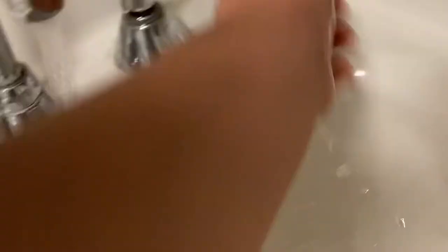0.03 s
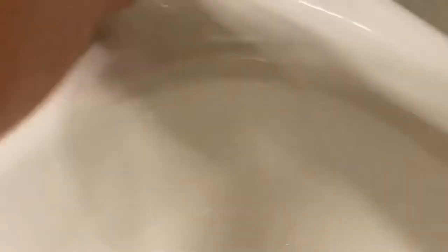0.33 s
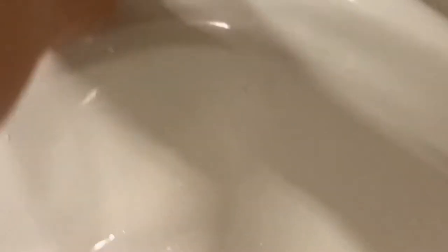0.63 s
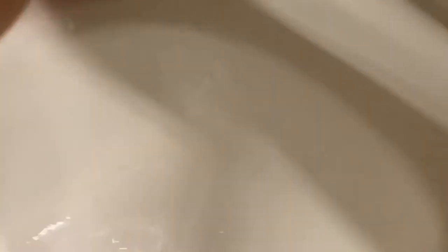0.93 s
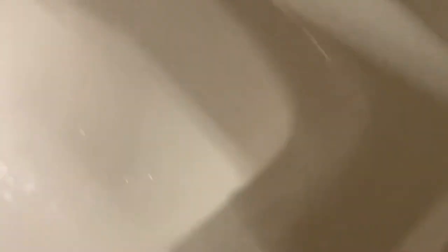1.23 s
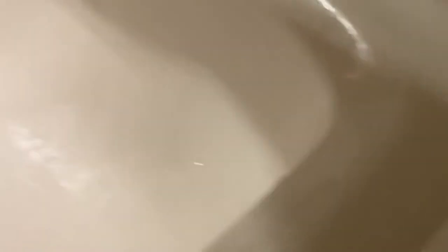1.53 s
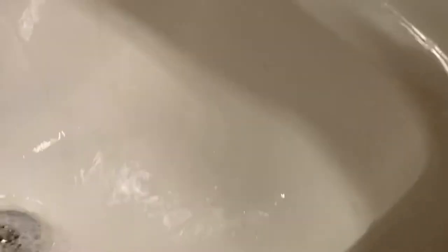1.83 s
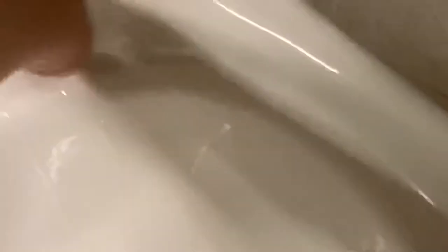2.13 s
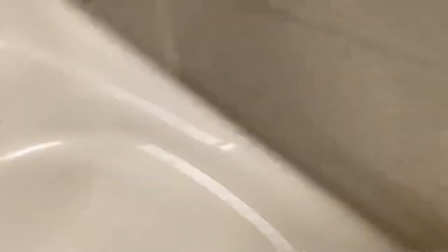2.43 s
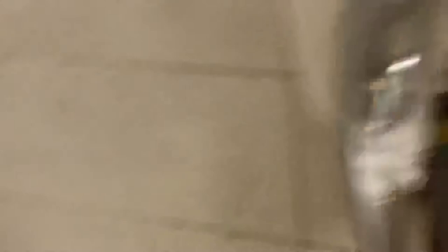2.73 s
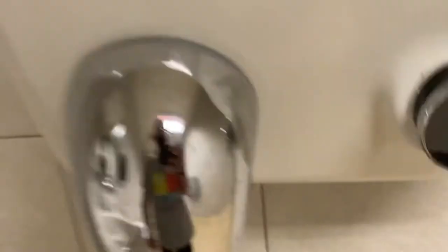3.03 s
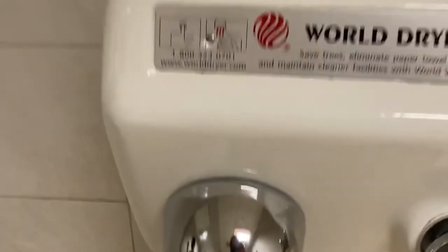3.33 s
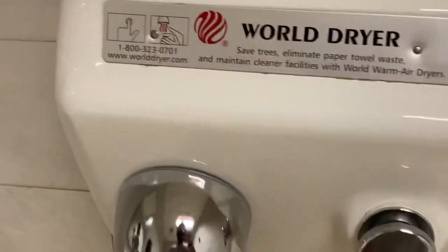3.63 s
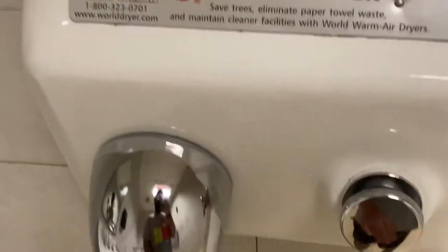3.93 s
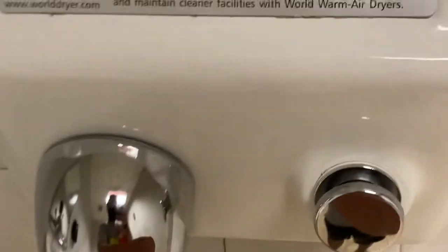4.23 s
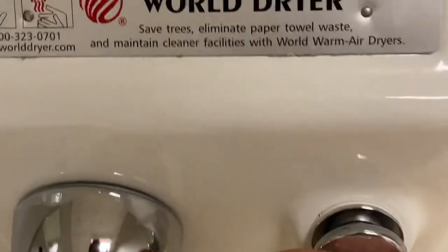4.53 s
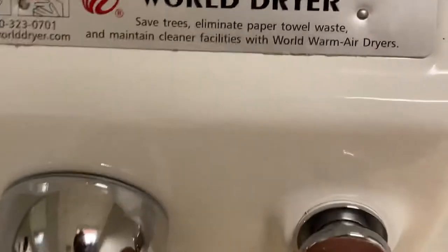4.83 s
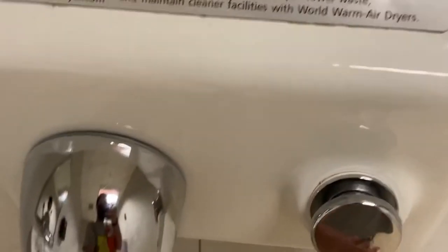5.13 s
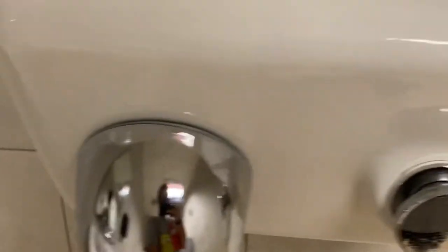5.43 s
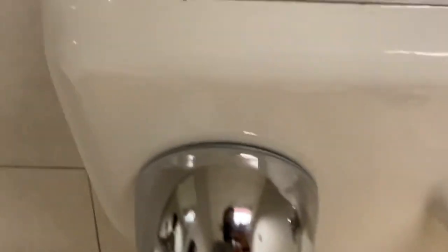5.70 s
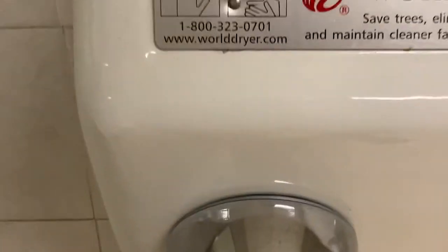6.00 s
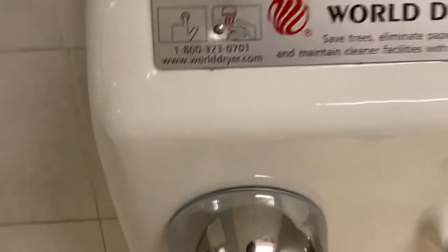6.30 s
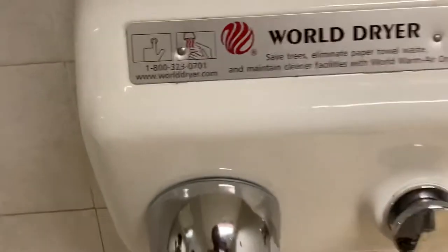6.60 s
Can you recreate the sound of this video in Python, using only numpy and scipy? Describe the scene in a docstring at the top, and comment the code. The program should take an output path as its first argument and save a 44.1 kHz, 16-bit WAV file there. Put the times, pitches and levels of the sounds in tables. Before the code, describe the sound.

Tap water splashes in a sink and stops, then a button clicks and a hand dryer spins up and roars.

```python
"""Ventilation rumbles in a small tiled restroom while a tap splashes over a hand into a china basin:
droplets slap, trapped bubbles ring and the basin drums. The valve sings as it shuts and the pipe thuds.
A few steps follow, with swishing sleeves and a faint high whistle. The button of a wall hand dryer is
pushed, its timer clacks in, the motor hums and spins up, and turbulent air roars and hisses through
the metal nozzle."""
import sys
import numpy as np
from scipy import signal
from scipy.fft import rfft, irfft, next_fast_len
from scipy.io import wavfile
from scipy.ndimage import uniform_filter1d

SR = 44100
rng = np.random.default_rng(int(sys.argv[2]) if len(sys.argv) > 2 else 0)


def wav_record(signal):
    """Record a signal, one row per channel, as 16-bit PCM in the file named by sys.argv[1]."""
    frames = np.transpose(np.atleast_2d(signal))
    bounded = np.clip(frames, -1, 1)
    # unit amplitude maps onto the largest positive 16-bit level
    quanta = np.round(bounded * 32767).astype(np.int16)
    wavfile.write(sys.argv[1], SR, quanta)


N = 293706
TIME = np.arange(N) / SR
SIZE = next_fast_len(N + SR)
FREQS = np.maximum(np.fft.rfftfreq(SIZE, 1 / SR), 1)
FULL_FLOW_DB = -26   # stream level at which all the water hits the china
MOTOR_ON_S = 4.605


def from_db(db):
    """Amplitude ratio of a level in decibels."""
    return 10 ** (np.asarray(db) / 20)


def rms_one(x):
    """Normalisation to unit rms."""
    return x / np.sqrt(np.mean(x ** 2) + 1e-20)


def in_time(rows):
    """Linear interpolation of each column at every sample; the first column is time."""
    s, *columns = np.transpose(rows)
    return [np.interp(TIME, s, c) for c in columns]


def at_hz(points, hz):
    """Interpolation on a logarithmic frequency axis."""
    return np.interp(np.log(hz), np.log(np.array(points)[:, 0]), np.array(points)[:, 1])


def ramp(start, end):
    """Linear rise from 0 to 1 between two times."""
    return np.clip((TIME - start) / (end - start), 0, 1)


def drift(rate_hz):
    """Slow random modulation: low-passed noise of unit rms."""
    hop = 40
    pole = np.exp(-2 * np.pi * hop * rate_hz / SR)
    slow = signal.lfilter([1], [1, -2 * pole, pole * pole], rng.standard_normal(N // hop + 2002))[2000:]
    return np.interp(np.arange(N) / hop, np.arange(len(slow)), rms_one(slow))


def eddies(depth_db, rate_hz):
    """Amplitude-modulated noise, swelling and sagging as eddies pass."""
    return rng.standard_normal(N) * from_db(depth_db * drift(rate_hz))


def ring(clicks, hz, t60):
    """Damped resonator: a unit impulse excites a decaying sine of unit amplitude."""
    r, w = np.exp(-np.log(1000) / (t60 * SR)), 2 * np.pi * hz / SR
    return signal.lfilter([0, np.sin(w)], [1, -2 * r * np.cos(w), r * r], clicks + 1e-18)


def ports(bins):
    """Phase difference between two microphone ports turns a spectrum into a stereo signal."""
    # Each row: frequency in Hz, lead of the left port in radians.
    port_phase = [(0, 0), (1600, .3), (2200, 1.5), (2700, 2.7), (3320, 2.5), (3550, 3.4), (3900, 5.4),
                  (4600, 5.9), (5200, 8.6), (5700, 9.4), (6400, 6.5), (7200, 6.28), (9050, 3.14),
                  (11300, 0), (13600, -3.14), (15500, -6.28)]
    lead = np.interp(FREQS, *np.transpose(port_phase))
    return irfft(bins * np.exp(.5j * lead * np.array([[1], [-1]])), SIZE)[:, :N]


def spread(near, spectrum, resonances=()):
    """Partial coherence: a source and the diffuse field that trails it, coloured alike, at unit rms."""
    # Each row: frequency in Hz, share of the power common to both ports.
    coherence = [(60, 0.916), (300, 0.801), (1150, 0.746), (1500, 0.387), (2200, 0.405), (2700, 0.114),
                 (3400, 0.224), (4500, 0.145), (5600, 0.106), (6300, 0.26), (7200, 0.69), (9000, 1),
                 (16000, 0.99)]
    gain = from_db(at_hz(spectrum, FREQS))
    for hz, width_hz, lift_db in resonances:
        gain = gain * from_db(lift_db / (1 + (2 * (FREQS - hz) / width_hz) ** 2))
    alike = np.clip(at_hz(coherence, FREQS), 0, 1)
    trail = np.sqrt(signal.lfilter([1], [1, -np.exp(-1 / (0.00305 * SR))], near ** 2 + 1e-18))
    diffuse = rfft(rms_one(trail * rng.standard_normal((2, N))), SIZE)
    direct = rfft(rms_one(near), SIZE)
    return rms_one(ports(gain * (np.sqrt(alike) * direct + np.sqrt(1 - alike) * diffuse)))


def near_walls(x, echo_db, sway_s):
    """Comb filtering: early reflections ripple the spectrum, shifting as the microphone moves."""
    lags = [lag + sway_s * drift(.5) for lag in rng.uniform(.001, .008, 4)]
    echoes = sum(x[np.clip(np.arange(N) - np.round(lag * SR).astype(int), 0, N - 1)] for lag in lags)
    return x + from_db(echo_db) * echoes


def tile_response():
    """Reverberation: the spectrum of the room's stereo tail, each band decaying at its own rate."""
    # Each row: frequency in Hz, reverberation time in seconds.
    room_t60 = [(100, 0.184), (500, 0.52), (3000, 0.574), (8000, 0.264), (16000, 0.061)]
    t, edges, tail = TIME[:SR * 3 // 4], np.geomspace(50, 18000, 9), 0
    for low, high in zip(edges, edges[1:]):
        bandpass = signal.butter(2, [low, high], "band", fs=SR, output="sos")
        band = signal.sosfilt(bandpass, rng.standard_normal((2, len(t))))
        tail = tail + band * np.exp(-np.log(1000) * t / at_hz(room_t60, np.sqrt(low * high)))
    tail = tail * np.clip(t / 0.00113, 0, 1)
    return rfft(tail / np.sqrt(np.sum(tail ** 2) / 2), SIZE)


def in_room(x, tiles, wet_db):
    """Convolution adds the reverberation of the tiles to the direct sound."""
    return ports(rfft(x, SIZE) * (1 + from_db(wet_db) * tiles))


def strike(blows, modes, crack_db, crack_s, top_hz, tail_db):
    """Modal response to impacts; countless small modes merge into a crack and a faint tail."""
    onsets, forces = [round(s * SR) for s, db in blows], from_db([db for s, db in blows])
    ringing, crack = np.zeros(N), np.zeros(N)
    for hz, level_db, t60 in modes:
        clicks = np.zeros(N)
        clicks[onsets] = forces * from_db(level_db + rng.normal(0, 2.01, len(onsets)))
        ringing += ring(clicks, hz, t60) * rng.choice([-1, 1])
    for i, force in zip(onsets, forces):
        age = TIME[:N - i]
        crack[i:] += force * (np.exp(-age / crack_s) + from_db(tail_db) * np.exp(-age / 0.0644))
    dull = signal.butter(2, min(top_hz, .45 * SR), fs=SR, output="sos")
    noise = signal.sosfilt(dull, signal.sosfilt(dull, crack * rng.standard_normal(N)))
    return ringing + from_db(crack_db) * noise


def wavering_tone(hz, depth_hz, rate_hz):
    """Random frequency modulation of a unit sine."""
    return np.sin(2 * np.pi * np.cumsum(hz + depth_hz * drift(rate_hz)) / SR)


def ventilation():
    """Broadband and tonal fan noise: duct rumble, two wavering tones and a faint wash of air."""
    # Each row: frequency in Hz, relative spectral density in dB.
    rumble_spectrum = [(22, -30), (38, -48.5), (55, 6), (72, -10.5), (95, 1), (115, -5), (145, 2),
                       (190, -8.5), (300, -18.5), (450, -26.5), (900, -47.5)]
    air_spectrum = [(150, -3), (320, 9.5), (500, -1.5), (750, -3), (1200, -8), (2300, -9.5), (4000, -17),
                    (7000, -24.5), (12000, -32.5), (16000, -56)]
    # Each row: time in seconds, level in dB.
    rumble_level = [(0.0, -33), (0.12, -39), (1.3, -36.5), (1.53, -38), (2.09, -38), (2.5, -38.5),
                    (2.7, -41), (2.97, -38.5), (3.02, -48), (3.06, -41), (3.12, -36), (3.3, -36.5),
                    (3.7, -39), (4.26, -40.5), (4.4, -37)]
    air_level = [(1.5, -47.5), (1.85, -50), (2.3, -49), (2.65, -50), (2.9, -48.5), (3.3, -48), (4.0, -48.5),
                 (4.2, -50.5)]
    # Each row: frequency in Hz, level in dB relative to the rumble level.
    fan_tones = [(72.5, -3.5), (139, -3.5)]
    rumble = from_db(-1.5) * spread(rng.standard_normal(N), rumble_spectrum)
    tones = sum(np.sqrt(2) * from_db(db + 2.0 * drift(3.46)) * wavering_tone(hz, 0.787, rate_hz=3.3)
                for hz, db in fan_tones)
    air = spread(near_walls(rng.standard_normal(N), echo_db=-9, sway_s=.0004), air_spectrum)
    duct = from_db(in_time(rumble_level)[0] - 0.5) * (rumble + tones)
    return duct + from_db(in_time(air_level)[0]) * air


def flow_db():
    """Strength of the tap stream in dB relative to full flow."""
    # Each row: time in seconds, stream level in dB.
    stream_level = [(0, -41), (0.17, -40), (0.45, -38.5), (0.538, -34), (0.558, -32), (0.622, -34),
                    (0.63, -26), (0.68, -26.3), (0.9, -24.5), (1.05, -25.3), (1.2, -31), (1.3, -39),
                    (1.41, -45), (1.53, -68)]
    return in_time(stream_level)[0] - FULL_FLOW_DB


def patter(per_s, size_spread_db):
    """Shot noise: uneven droplets land at random, with a mean power independent of their rate."""
    sizes = from_db(size_spread_db * np.minimum(rng.exponential(1, N), 4)) * rng.choice([-1, 1], N)
    return sizes * (rng.random(N) < per_s / SR) / np.sqrt(per_s)


def tap(tiles):
    """Droplet impacts on hand and china, bubble resonance and basin drumming all follow the flow."""
    # Each row: frequency in Hz, relative spectral density in dB.
    spray_spectrum = [(1200, -23.5), (2450, -24), (2850, -13), (3200, 1), (3600, 3), (4100, -1),
                      (4700, -11), (6000, -7), (7000, -1), (9800, 4), (11500, 1.5), (13500, -5.5),
                      (16000, -13)]
    basin_spectrum = [(90, -12), (185, 13.5), (245, 2.5), (310, 10.5), (380, 10), (560, 6.5), (850, -2),
                      (1150, -3), (1700, -2.5), (2500, -3), (3500, -9)]
    # Each row: frequency in Hz, width in Hz, lift in dB.
    basin_resonances = [(578, 50, 4.3), (1145, 80, 7.5)]
    flow, trickle_per_s = flow_db(), 400
    per_s = trickle_per_s + 6000 * from_db(1.7 * flow)   # a stronger stream breaks into more droplets
    # A thin stream lands in gobs, each dying within milliseconds; a full one is more even.
    landings = (rng.random(N) < 90 / SR) * rng.random(N)
    gobs = signal.lfilter([1], [1, -np.exp(-1 / (0.0024 * SR))], landings + 1e-18)
    lumps = 1 + 5.5 * gobs * np.sqrt(trickle_per_s / per_s)
    lumps /= np.sqrt(uniform_filter1d(lumps ** 2, size=SR // 5))
    impacts = patter(per_s, size_spread_db=5.0) * lumps
    spray = spread(near_walls(impacts, echo_db=-9.5, sway_s=.0004), spray_spectrum)
    bubbles = sum(ring(patter(per_s / 160, size_spread_db=9), hz, t60=32 / hz)
                  for hz in np.geomspace(3150, 4600, 22))
    fizz = in_room(rms_one(bubbles), tiles, wet_db=-5)
    drumming = spread(patter(per_s, size_spread_db=0.5), basin_spectrum, basin_resonances)
    water = from_db(FULL_FLOW_DB + flow) * (from_db(1.5) * spray + from_db(-12) * fizz)
    water += from_db(-32.3 + 0.53 * flow) * drumming
    return water * (1 - ramp(1.64, 1.642))


def small_drops(count):
    """Random sampling of lesser drops: rows of time, level and pitch, the level following the flow."""
    last_s, low_hz, high_hz = 1.44, 3300, 12500
    when, size, pitch = rng.random((count, 3)).T
    s = last_s * (np.arange(count) + when) / count
    level_db = -19 + .75 * np.interp(s, TIME, flow_db()) + 3 * (2 * size - 1)
    return list(zip(s, level_db, low_hz * (high_hz / low_hz) ** pitch))


def drops(tiles):
    """Impact and bubble resonance: a drop slaps, sprays briefly and traps air that rings a few cycles."""
    # Each row: start in seconds, level in dB, bubble pitch in Hz.
    loud_drops = [(0.0253, -21, 4000), (0.029, -23, 7200), (0.0488, -24, 7720), (0.0662, -21, 7620),
                  (0.078, -25, 7400), (0.0992, -20, 7530), (0.1306, -10, 4160), (0.1434, -19, 4140),
                  (0.1465, -20, 6900), (0.1675, -18.5, 4160), (0.1885, -23, 7500), (0.1945, -21, 3870),
                  (0.2214, -18, 4120), (0.2304, -15, 11200), (0.2478, -18, 7750), (0.2574, -19, 7350),
                  (0.2758, -18, 3930), (0.2932, -19, 3650), (0.3062, -16, 4610), (0.3098, -19, 7000),
                  (0.3341, -22, 4550), (0.3392, -22, 7400), (0.3666, -18, 10500), (0.3925, -19, 11000),
                  (0.3974, -18, 4410), (0.4199, -16, 11600), (0.4354, -16.5, 12200), (0.4638, -18, 4780),
                  (0.4903, -17, 10800), (0.5302, -20, 7300), (0.5477, -19, 4320), (0.5601, -14, 4370),
                  (0.5811, -11.5, 10100), (0.5978, -13, 11000), (0.6285, -15, 11600), (0.6324, -9.5, 3500),
                  (0.6404, -14, 3540), (0.6594, -13, 11700), (0.7216, -12, 11500), (0.767, -15, 11400),
                  (0.8423, -14, 11600), (0.8748, -14, 7210), (0.8967, -13, 11300), (0.9601, -14, 10800),
                  (1.0194, -14, 11500), (1.0454, -12, 10500), (1.0574, -10, 11200), (1.07, -8, 10800),
                  (1.0903, -14, 11200), (1.1194, -13, 10700), (1.1274, -13, 10700), (1.1653, -16, 3860),
                  (1.281, -17, 3900), (1.3039, -18, 6800), (1.3483, -16, 7530), (1.4017, -26, 11100),
                  (1.4135, -25, 11000), (1.4182, -23, 11000), (1.441, -31, 7500)]
    slap_s, spray_s, decay_cycles = .0015, .005, 5.0
    rise_per_s = 25   # relative climb in pitch as a bubble nears the surface
    out, t = np.zeros(N), TIME[:SR // 20]
    thin = signal.butter(2, 3200, "high", fs=SR, output="sos")
    splash = np.exp(-t / slap_s) + from_db(-18) * np.exp(-t / spray_s)
    attack = np.clip(t / 0.0004, 0, 1)
    for s, level_db, hz in list(loud_drops) + small_drops(count=30):
        bubble = np.sin(2 * np.pi * hz * t * (1 + rise_per_s * t / 2)) * np.exp(-t * hz / decay_cycles)
        slap = signal.sosfilt(thin, rng.standard_normal(len(t)) * splash)
        drop = from_db(-2.5) * bubble + from_db(-0.5) * slap
        out[round(s * SR):][:len(t)] += from_db(level_db) * drop * attack
    return in_room(out, tiles, wet_db=-8.5)


def valve(tiles):
    """The closing valve sings a wavering note; then blows excite the pipe's modes in a thud."""
    # Each row: start in seconds, level in dB.
    pipe_blows = [(1.213, -20.5), (1.2222, -28.5), (1.236, -25.5), (1.2495, -29)]
    # Each row: frequency in Hz, relative level in dB, 60 dB decay time in seconds.
    pipe_modes = [(201.96, -11.5, 0.82), (349.9, -10, 0.15), (422, -0.5, 0.105), (485.4, 3.5, 0.067),
                  (567.6, -4, 0.076), (690.6, -11, 0.059), (763, -16, 0.053), (1330, -32.5, 0.059),
                  (1820, -23.5, 0.049), (2660, -8, 0.035)]
    peak_s, rise_db_per_s, fall_db_per_s = 1.093, 481.5, 143
    age = TIME - peak_s
    song_db = -29.5 + np.minimum(rise_db_per_s * age, -fall_db_per_s * age)
    song = from_db(song_db) * wavering_tone(562.8, depth_hz=9, rate_hz=33)
    thud = strike(pipe_blows, pipe_modes, crack_db=-2.0, crack_s=0.0081, top_hz=3280, tail_db=-21)
    return in_room(song + thud, tiles, wet_db=-2.5)


def walk(tiles):
    """Impact and friction: dull footfalls, shoes brushing the floor, and a sleeve brushing past with a bright
    swish."""
    # Each row: start in seconds, level in dB.
    footfalls = [(1.594, -49), (1.993, -34), (2.012, -45.5), (2.153, -45.5)]
    # Each row: frequency in Hz, relative level in dB, 60 dB decay time in seconds.
    step_modes = [(92.5, 5.5, 0.36), (139.5, 0, 0.26), (348, -1.5, 0.147), (435, -1.5, 0.158),
                  (640, 2.5, 0.04), (915, -13, 0.078), (1214, -13.5, 0.08), (1490, -13.5, 0.086),
                  (2232, -23.5, .1), (3485, -18, 0.053)]
    # Each row: start in seconds, level in dB, decay time in seconds, high-pass cutoff in Hz.
    scuffs = [(1.964, -48, .03, 400), (2.151, -34, 0.02, 1500), (2.41, -45, .02, 900),
              (2.45, -34, 0.05, 3500), (2.76, -35.5, 0.018, 300), (2.793, -36, 0.055, 400),
              (3.35, -44, .035, 2000)]
    # Each row: frequency in Hz, relative spectral density in dB.
    scuff_spectrum = [(300, 15), (900, 3), (2200, 2), (4000, -3.5), (5500, -15), (7000, -20), (11000, -25),
                      (16000, -34)]
    brush, grit = 0, spread(eddies(depth_db=1.0, rate_hz=86), scuff_spectrum)
    for s, level_db, decay_s, low_hz in scuffs:
        age = np.maximum(TIME - s, 0)
        rub = signal.sosfilt(signal.butter(2, low_hz, "high", fs=SR, output="sos"), grit)
        brush = brush + from_db(level_db) * (1 - np.exp(-age / 0.003)) * np.exp(-age / decay_s) * rub
    steps = strike(footfalls, step_modes, crack_db=7.5, crack_s=0.0074, top_hz=1900, tail_db=-20)
    return in_room(steps, tiles, wet_db=-6.0) + brush


def sleeves():
    """Friction noise of cloth swells and fades with each stride."""
    # Each row: time of the peak in seconds, level in dB, time constant of rise and fall in seconds.
    swishes = [(2.52, -61, .05), (3.13, -63, .06), (3.64, -59, .07), (4.0, -69, .06)]
    # Each row: frequency in Hz, relative spectral density in dB.
    cloth_spectrum = [(1500, -20), (4500, -2), (7000, 0), (11000, -2), (16000, -16)]
    swell = sum(from_db(db) * np.exp(-np.abs(TIME - s) / fade_s) for s, db, fade_s in swishes)
    return swell * spread(eddies(depth_db=2.5, rate_hz=45), cloth_spectrum)


def whistles():
    """A faint high tone, modulated at random in level and pitch, comes and goes."""
    # Each row: start in seconds, end in seconds, frequency in Hz, level in dB.
    tones = [(2.82, 3.3, 7989, -76), (3.7, 4.42, 7989, -77)]
    out = 0
    for start, end, hz, db in tones:
        gate = ramp(start, start + .04) * (1 - ramp(end - .04, end))
        out = out + gate * from_db(db + 2.5 * drift(6)) * wavering_tone(hz, depth_hz=4, rate_hz=20)
    return np.sqrt(2) * out


def start_button(tiles):
    """Modal ringing: the button rattles, the switch snaps, the casing thumps and the timer latches."""
    # Each row: start in seconds, level in dB.
    button_blows = [(4.4415, -25), (4.4525, -27), (4.461, -28.5), (4.798, -21), (4.813, -22),
                    (4.829, -22.5), (4.848, -25)]
    switch_blows = [(4.5815, -20.5)]
    casing_blows = [(4.596, -27.5), (4.604, -23.5), (4.608, -25.5), (4.612, -31), (4.622, -24.5)]
    timer_blows = [(4.6245, -33), (4.629, -17.5), (4.6362, -20)]
    # Each row: frequency in Hz, relative level in dB, 60 dB decay time in seconds.
    button_modes = [(268.4, -9, 0.067), (774.5, -3, 0.07), (983.8, 1, 0.068), (1102, -7.5, 0.039),
                    (1684, -4, 0.06), (1888, -16, 0.052), (2035, -11, 0.11), (2250, -20.5, .08),
                    (3042, -7.5, 0.042), (3644, -11.5, 0.0667), (4440, -23.5, 0.068), (4490, -30, .07),
                    (6220, -16.5, 0.055), (6600, -24.5, .05)]
    switch_modes = [(7070, -26, 0.036), (8300, -17, 0.039), (10180, -10, 0.048), (11300, -13, 0.0204),
                    (12600, -11.5, 0.017), (15000, -22.5, 0.0196)]
    casing_modes = [(77.8, 0, 0.505), (203, -2, 0.136), (253.7, 1.5, 0.065), (315, -3, 0.122),
                    (393.5, -10, 0.105), (535.5, -10.5, 0.116)]
    timer_modes = [(565, -16.5, 0.197), (809, -4.5, 0.053), (1035, -5, 0.057), (1678, 2.5, 0.036),
                   (1850, -5.5, 0.0304), (2073, -12, .04), (2265, -3, 0.03), (2850, -10, 0.089),
                   (3060, -11, 0.22), (3105, -13, 0.2), (3155, -17, 0.55), (3381, -11, 0.16),
                   (3707, -13, 0.064), (5250, -13, 0.06)]
    button = strike(button_blows, button_modes, crack_db=-4, crack_s=.0053, top_hz=6600, tail_db=-11)
    switch = strike(switch_blows, switch_modes, crack_db=-10.5, crack_s=.0008, top_hz=15000, tail_db=-9.5)
    casing = strike(casing_blows, casing_modes, crack_db=-1, crack_s=.0075, top_hz=1500, tail_db=-28)
    timer = strike(timer_blows, timer_modes, crack_db=0, crack_s=.00695, top_hz=5370, tail_db=-11.5)
    return in_room(button + timer, tiles, wet_db=-9.5) + in_room(switch + casing, tiles, wet_db=-3.5)


def fan_speed():
    """Rotor speed as a share of full speed: a jerk at switch-on, then an exponential approach."""
    nine_tenths_at_s, time_constant_s = 5.023, .235
    lag = np.exp(-(np.maximum(TIME, MOTOR_ON_S) - nine_tenths_at_s) / time_constant_s) / 10
    return np.clip(1 - lag, 0, 1) * ramp(MOTOR_ON_S, MOTOR_ON_S + 0.057)


def motor(speed):
    """Beating of hums at twice the mains and twice the rotor rate; a thin whine climbs with speed."""
    # The whine swells and fades as the microphone moves. Each row: time in seconds, relative level in dB.
    whine_level = [(4.8, -60), (5.14, -34), (5.4, -40), (5.52, -30), (5.68, -33), (5.76, -40),
                   (5.88, -30.5), (6.22, -31), (6.35, -41), (6.48, -30), (6.65, -39)]
    mains_hz, rotor_hz, whine_order = 60, 59.24, 56
    beat_dip_s = 5.74   # the two hums are in antiphase here
    inrush_db, inrush_slip = 10.5, 0.266   # extra hum of the starting current, full above this slip
    turns = np.cumsum(rotor_hz * speed) / SR
    rotor_phase = 2 * np.pi * (turns - np.interp(beat_dip_s, TIME, turns))
    magnetic_phase = 2 * np.pi * 2 * mains_hz * (TIME - beat_dip_s)
    current_db = inrush_db * np.minimum((1 - speed) / inrush_slip, 1)
    attack = 1 - np.exp(-np.maximum(TIME - MOTOR_ON_S, 0) / 0.039)
    buzz = sum(from_db(db) * np.sin(k * magnetic_phase) for k, db in enumerate([0, -20, -20], 1))
    magnetic_hum = from_db(-29.5 + current_db) * attack * buzz
    rotor_hum = from_db(-30) * speed ** 2 * np.sin(2 * rotor_phase)
    # The airstream shakes the whine in pitch and level.
    flutter = 2 * np.pi * np.cumsum(6.5 * drift(41.8)) / SR
    whine_db = in_time(whine_level)[0] - 2.0 + 3.0 * drift(18)
    whine = from_db(whine_db) * speed * np.sin(whine_order * rotor_phase + flutter)
    return np.sqrt(2) * (magnetic_hum - rotor_hum + ports(rfft(whine, SIZE)))


def blower(speed):
    """Turbulence rings the scroll and nozzle and hisses at the exit, growing as powers of fan speed."""
    # Each row: frequency in Hz, relative spectral density in dB.
    roar_spectrum = [(350, -26), (520, -4), (800, -0.3), (1120, 0.5), (1240, -0.7), (1300, -8.5),
                     (1600, -8.5), (2000, -10.5), (2650, -12), (3500, -20.5), (4800, -51.5)]
    hiss_spectrum = [(2200, -7.5), (3300, 3.5), (4200, 7), (5000, 4.5), (6000, 1), (7500, 2), (9200, -1),
                     (11300, 1.5), (13500, -6.5), (16000, -37.5)]
    buffet_spectrum = [(35, -43), (60, -24.5), (85, -1), (140, -1), (200, 2), (250, 2), (340, 4.5),
                       (480, 0), (700, -28.5)]
    # Each row: frequency in Hz, width in Hz, lift in dB.
    duct_resonances = [(251, 36, 6), (312, 25, 3), (566, 50, 3), (765, 50, 5), (885, 60, 2.5),
                       (1008, 48, 6), (1065, 35, 3), (1120, 40, 3), (1207, 32, 5.3), (1340, 18, 5),
                       (1421, 30, 7.5), (1753, 28, 7.5), (2218, 40, 6), (2525, 70, 5.5), (2615, 40, 3),
                       (2735, 55, 6), (3135, 50, 7.5)]
    # Each row: time in seconds, relative levels of roar and of hiss in dB.
    jet_levels = [(5.28, -21.5, -31.5), (5.362, -17.5, -30.5), (5.368, -22, -32), (5.45, -20.5, -31),
                  (5.694, -21, -34), (5.742, -20.5, -32.5), (6.26, -22, -35), (6.276, -23.5, -34.5),
                  (6.612, -22.5, -35.5), (6.62, -24, -35.5)]
    # Each row: time in seconds, relative level of the low buffeting in dB.
    buffet_level = [(4.72, -34), (4.774, -37.5), (4.822, -25.5), (4.882, -30), (5.248, -30), (5.578, -24),
                    (5.616, -32), (5.848, -22.5), (5.968, -27), (6.016, -23.5), (6.06, -27), (6.66, -29.5)]
    roar_db, hiss_db = in_time(jet_levels)
    duct_flow = near_walls(eddies(depth_db=0.9, rate_hz=16.2), echo_db=-11, sway_s=.0005)
    roar = from_db(roar_db + 1.6) * speed ** 2.656 * spread(duct_flow, roar_spectrum, duct_resonances)
    jet = near_walls(eddies(depth_db=1.0, rate_hz=19.6), echo_db=-2.5, sway_s=.0002)
    hiss = from_db(hiss_db + 2.5) * speed ** 4.2 * spread(jet, hiss_spectrum)
    gusts = spread(eddies(depth_db=0.78, rate_hz=15.4), buffet_spectrum, duct_resonances)
    buffet = from_db(in_time(buffet_level)[0] + 1.5) * speed * gusts
    return roar + hiss + buffet


def scene():
    """Superposition of all the sources in the restroom."""
    tiles, speed = tile_response(), fan_speed()
    sink = tap(tiles) + drops(tiles) + valve(tiles)
    dryer = start_button(tiles) + blower(speed) + motor(speed)
    return sink + walk(tiles) + sleeves() + whistles() + dryer + ventilation()


def record(dry):
    """Frequency response of the ports: the left is a little louder in the midrange; the top is cut."""
    # Each row: frequency in Hz, excess of left over right in dB.
    balance = [(180, .2), (300, 2.0), (1300, 2.4), (2100, 0)]
    cutoff_hz = 15900
    lowpass = 1 / np.sqrt(1 + (FREQS / cutoff_hz) ** 200)
    port_gains = from_db(at_hz(balance, FREQS) * np.array([[.5], [-.5]]))
    return irfft(rfft(dry, SIZE) * lowpass * port_gains, SIZE)[:, :N]


dry = scene()
out = record(dry)
wav_record(out)
```